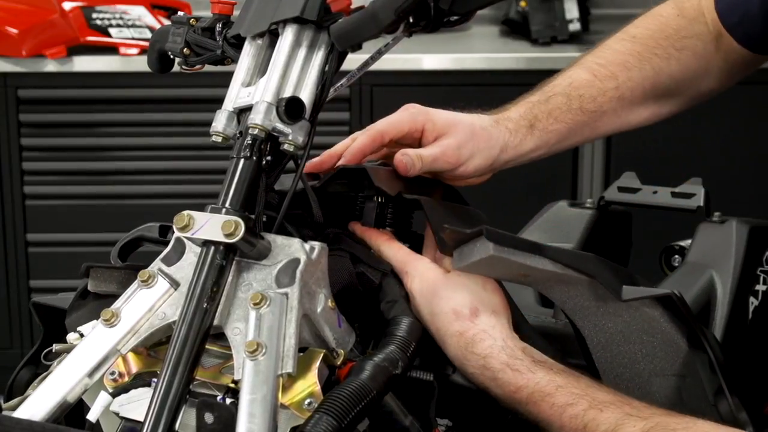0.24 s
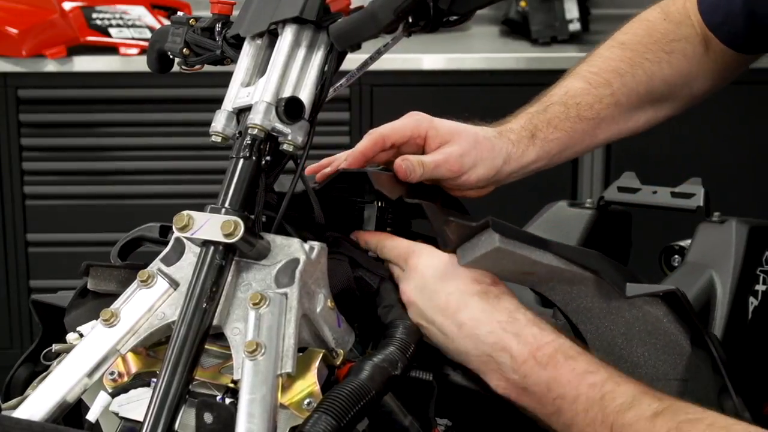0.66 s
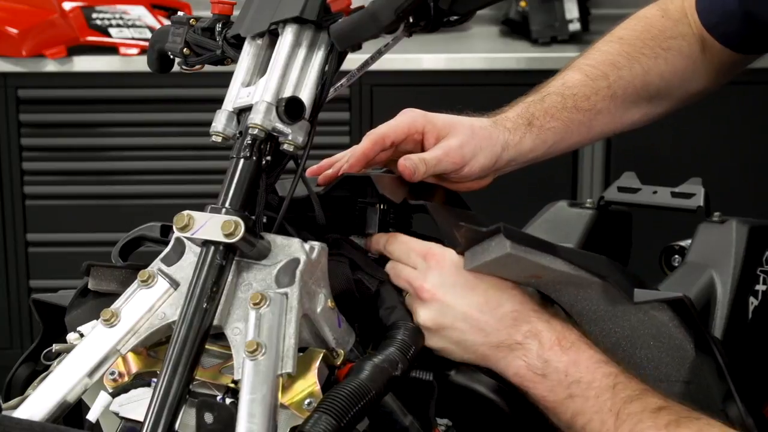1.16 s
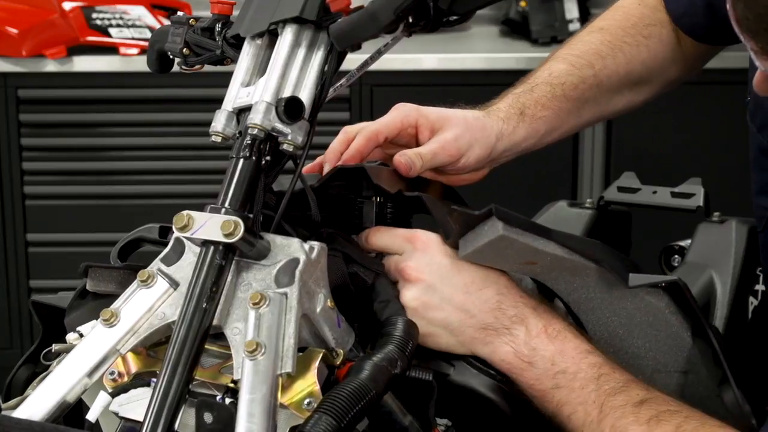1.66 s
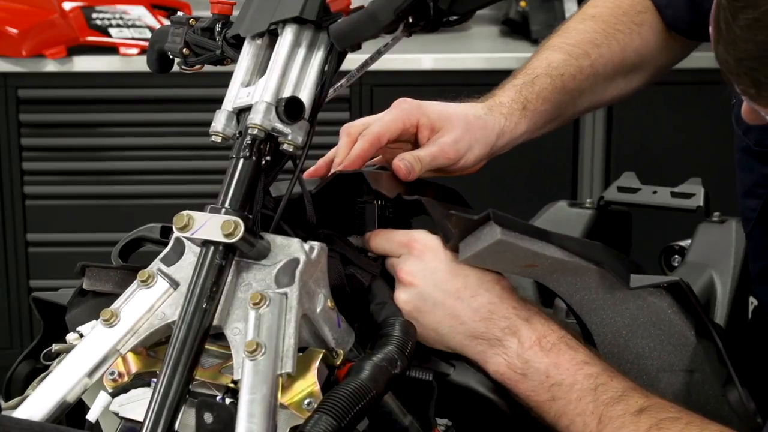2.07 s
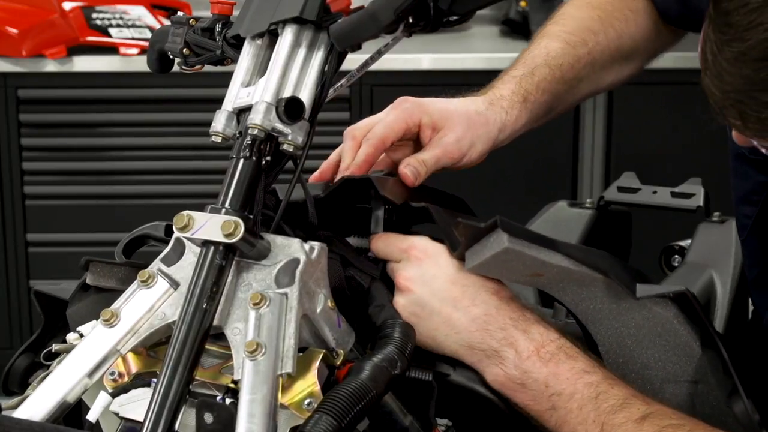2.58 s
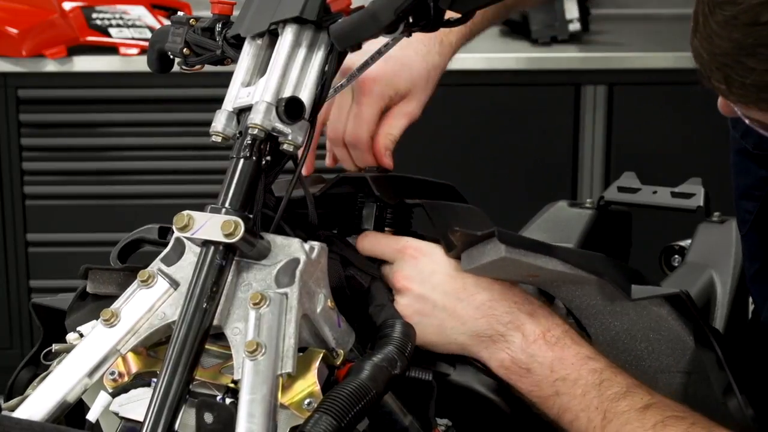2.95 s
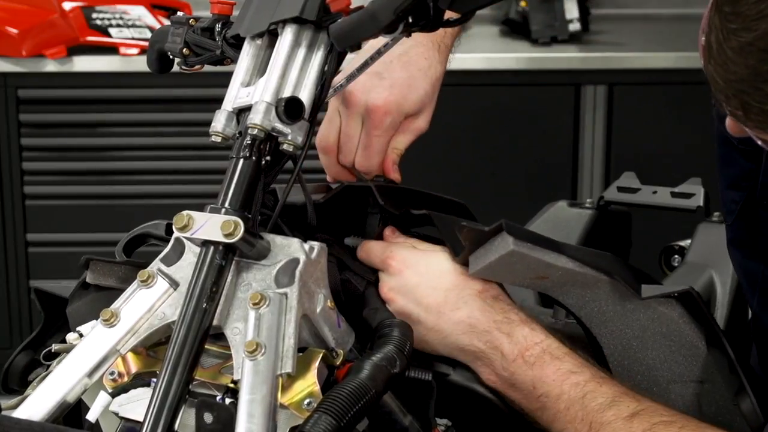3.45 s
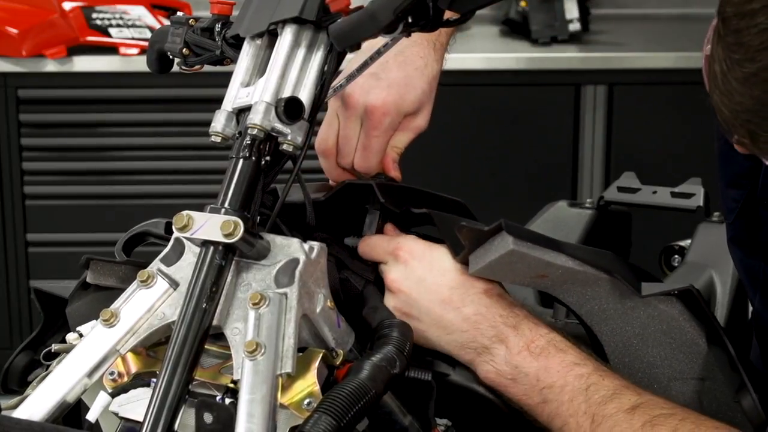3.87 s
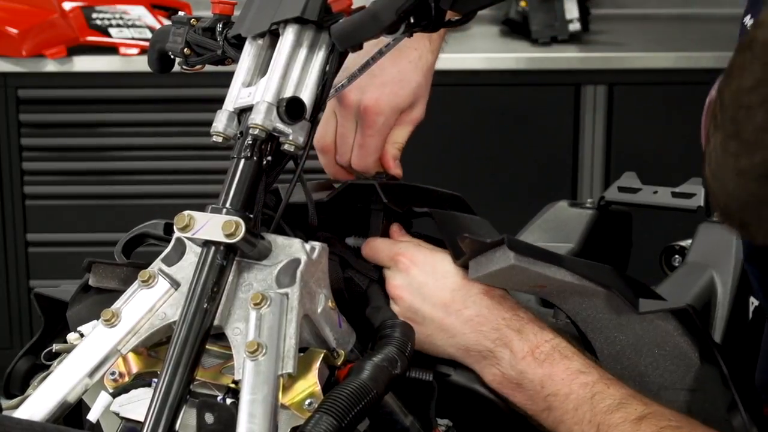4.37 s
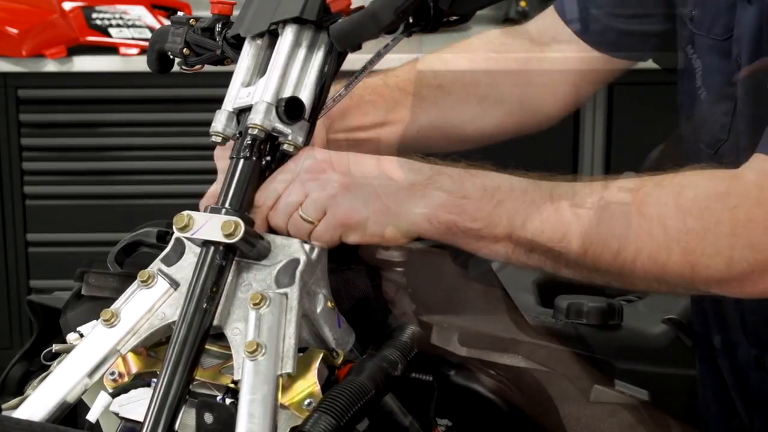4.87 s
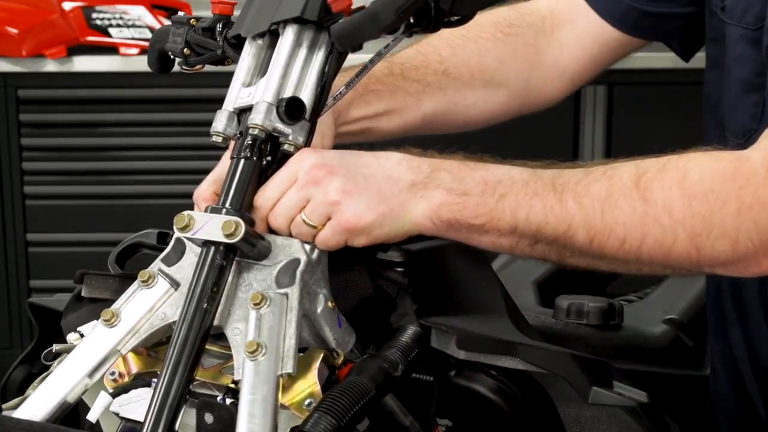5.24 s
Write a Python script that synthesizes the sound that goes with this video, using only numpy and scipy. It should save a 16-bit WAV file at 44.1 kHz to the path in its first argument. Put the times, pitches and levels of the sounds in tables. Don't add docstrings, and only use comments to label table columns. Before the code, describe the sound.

Quiet rustling and scraping of plastic parts on a motorcycle frame, scattered ticks, one loud crisp snap near four seconds, then more handling.

```python
import sys
import numpy as np
from scipy import signal
from scipy.fft import rfft, irfft
from scipy.io import wavfile
from scipy.ndimage import uniform_filter1d

SR = 44100
rng = np.random.default_rng(int(sys.argv[2]) if len(sys.argv) > 2 else 0)


def undo_db(level):
    steps = np.asarray(level, float) / 20
    return 10 ** steps


def unload_wav(signal):
    wavfile.write(
        sys.argv[1],
        SR,
        np.round(np.clip(np.atleast_2d(signal).T, -1, 1) * 32767).astype(np.int16),
    )


N = 243017

# (frequency [Hz], width [Hz], level [dB])
FRAME_MODES = [(60.4, 40, -1.5), (96, 40, -2), (135, 37, 1.5), (203, 51, -1.5), (282.6, 170, -3)]
PANEL_MODES = [(373, 286, -0.5), (548, 170, -3), (690, 200, -3.5), (1000, 340, -8), (1393, 700, -7.5)]
SKIN_MODES = [(1670, 560, 5), (2500, 670, 0.5), (3580, 1200, 0), (5170, 2200, -0.5)]
CLOTH_MODES = [(7000, 4700, -1.5), (9500, 2400, -.6), (11600, 2100, -0.082), (14450, 1500, -1.7)]
# (start [s], hold [s], panel scrape [dB], frame re scrape [dB])
SHOVES = [(0.0, 0.0026, -53, 6), (.05, 0.093, -69, 12.5), (.29, 0.12, -64, 6), (.46, 0.12, -67.5, 10),
          (.66, .04, -60, 1.5), (.76, 0.065, -76.5, 13), (.92, .1, -60, -4), (1.07, 0.078, -59, -3),
          (1.365, .04, -57, 2), (1.47, 0.062, -59, 3), (1.73, 0.027, -67.5, 9.5), (1.84, 0.052, -59, -3),
          (2.19, 0.037, -60.5, 3), (2.27, 0.06, -58.5, 3), (2.42, 0.045, -56, 6.5), (2.69, 0.035, -51, 3),
          (2.83, .04, -65, 11), (2.96, 0.071, -58, 1), (3.16, .02, -57, -9), (3.26, 0.015, -57.5, 0),
          (3.55, 0.029, -72, 3), (3.75, 0.012, -76, -9), (4.03, .1, -57, 5), (4.33, 0.098, -56, 4),
          (4.5, 0.061, -62.5, 3.5), (4.81, .02, -56.5, -10), (4.94, 0.031, -54.5, -5.5),
          (5.05, .02, -61, 2), (5.13, 0.064, -60, 2.5), (5.39, 0.095, -53, 6)]
# (start [s], hold [s], cloth hiss [dB], skin drag re hiss [dB])
SLIDES = [(0.0, .005, -75, 6), (.4, 0.02, -70.5, -4), (.665, 0.02, -68, 5.5), (.825, 0.015, -68, -9),
          (.92, 0.1, -82, 17), (1.09, 0.062, -72, 7), (1.24, 0.012, -82.5, 12), (1.32, 0.071, -63.5, -1),
          (1.69, 0.0085, -84, 9), (1.85, 0.054, -74.5, 4.5), (1.96, 0.076, -72, 6.5),
          (2.1, 0.0076, -75.5, 4), (2.17, 0.033, -76.5, 5.5), (2.3, 0.033, -72.5, 6),
          (2.42, 0.016, -74.5, 8), (2.59, .05, -73.5, 1), (2.68, 0.044, -72.5, 3), (2.77, .11, -76.5, 3.5),
          (3.01, .015, -72.5, 8.5), (3.18, 0.054, -76.5, 9.5), (3.26, 0.037, -75, 4),
          (3.75, 0.012, -83.5, 12), (4.34, 0.088, -64, 1.5), (4.44, 0.12, -65.5, -5),
          (4.6, 0.036, -71, 4.5), (4.68, 0.2, -70.5, 0.5), (4.9, 0.092, -67.5, -2), (4.95, .025, -74, 14.5),
          (5.05, 0.1, -74.5, 1.5), (5.34, 0.055, -72, 5)]
REST_DB = [-63, -68, -77.5, -83]
# (time [s], blow on the tab [dB], blow on the bracket [dB])
LATCH_SLIPS = [(3.947, -19, -30.5), (3.9473, -5, -18.5), (3.9486, 0, -15.5), (3.9499, -3.5, -17),
               (3.9506, -2, -10.5), (3.9516, -4, 5), (3.9522, -1.5, -1), (3.9535, -7, -7),
               (3.9544, -11, -9), (3.9567, -15, -10.5), (3.9596, -24.5, -7)]
# (frequency [Hz], level [dB], time to fall 60 dB [s])
SHELL_MODES = [(42, -19, 0.043), (447, -13, .065), (725, -7, 0.03), (905, -7, .04), (1031, -11, 0.04),
               (1125, -12, 0.03), (1290, -14, 0.03), (1431, -12, 0.035), (1650, -7, .028), (1935, -9, .016),
               (2400, -5, 0.012), (2800, -3, .013), (3190, -4, .02), (3455, 3.5, .02), (3760, -9.5, .015),
               (4035, -3, 0.014), (4630, -10, 0.015), (4905, -1, 0.015), (5560, -10.5, 0.014),
               (6200, -15.5, .008), (6900, -10, 0.009), (7490, -15, 0.006), (9220, -18.5, .007),
               (10200, -9, 0.0051), (12800, -22.5, .007), (14500, -25, .007)]
# (time [s], peak [dB], ring [Hz], panel re peak [dB])
TAPS = [(.0005, -40, 1000, 1), (.002, -49, 1700, -5), (.012, -47, 1150, -3), (.058, -58, 4100, 0),
        (.36, -61, 1800, 0), (.447, -59, 2000, 0), (.553, -58, 1500, 0), (.617, -63, 4200, 2),
        (0.2945, -49, 800, 0), (.399, -54.5, 1180, -2), (0.4749, -51, 1600, 0), (.6438, -55, 1170, -9),
        (0.6693, -56, 2550, 2), (0.8755, -51, 1090, -18), (1.317, -48, 1300, 2.5), (1.451, -51, 1090, -12),
        (1.477, -42, 1600, -11), (1.8465, -50.5, 1090, 6), (1.847, -54, 3700, -6), (1.882, -56, 760, -4),
        (1.898, -56, 700, -4), (1.916, -59, 2500, 0), (1.504, -59, 2300, 5), (1.56, -56, 1800, 2),
        (2.0853, -61.5, 1390, 0), (2.1971, -48, 1670, -2), (2.352, -59, 1010, -3), (2.419, -56, 4500, 6),
        (2.647, -51, 1000, -2), (2.682, -40.5, 790, -3), (2.7268, -38, 1090, -3), (2.772, -57, 1030, 10.5),
        (2.9647, -49, 1130, -2.5), (3.0092, -50, 1620, -2), (3.259, -42, 320, 0), (4.3769, -53, 1020, -1),
        (4.64, -54.5, 2500, 4.5), (4.817, -51, 2000, 2), (4.9531, -46, 1540, -1),
        (5.147, -59.5, 1232, 10.5), (5.3363, -49, 1400, -3), (5.3445, -54, 900, 0), (5.3515, -55, 2300, 4),
        (5.358, -54, 800, 0), (5.3728, -36, 950, -3), (5.385, -54, 2800, 9), (5.401, -54, 2500, 8),
        (5.414, -54, 2100, 8), (5.437, -56, 2600, 9), (5.479, -52, 1100, 2), (5.4614, -51, 1250, 1.5)]
# (time [s], peak [dB], ring [Hz], crack re peak [dB], time to fall 60 dB [s])
CLICKS = [(2.5195, -59, 4000, -13, .02), (2.576, -40, 4300, -12, 0.011), (2.576, -33, 13000, -20, 0.011),
          (2.5766, -31, 7000, 0.5, .009), (2.6063, -41.5, 1200, 9, 0.0066), (2.6068, -28, 5800, -4, .013),
          (2.607, -32, 12500, -20, .014), (3.1695, -52, 4340, -10, 0.026), (3.2546, -38, 2900, -20, 0.013),
          (3.2544, -40, 8300, -4, .016), (3.3447, -36.5, 2220, -30, .007), (3.345, -42.5, 5500, -8, .01),
          (3.6013, -49, 2300, -12, 0.011), (4.2095, -46, 6200, 0.5, .017), (4.2095, -37, 3480, -13, 0.024),
          (4.865, -51.5, 1000, 5, .019), (5.039, -56, 5030, -7, .013), (5.155, -55, 3500, -5, .027),
          (5.238, -58, 3490, -1, .015)]
# (frequency [Hz], level [dB], time to fall 60 dB [s])
CLIP_MODES = [(460, -7, .03), (775, -2, .024), (1070, -5, .03), (1270, -8, .03), (1650, 0, .034),
              (2380, -5, .016), (2750, -3, .013), (3200, -5, .014), (3900, -6, .011), (4830, -11, .014),
              (5470, -14, .013), (6500, -18, .01), (7430, -12, .009), (8400, -12, .007)]
# (time [s], level [dB], pitch factor [1], tilt away from main ring [dB per octave])
FLICKS = [
    (3.1675, -49, 1.045, -4),
    (3.1693, -38, 1.045, -4.5),
    (3.1727, -44, 1.045, -6),
    (3.2435, -58, 1.01, 0),
    (3.2542, -36.5, 1.001, .6),
    (3.2554, -39, 1.001, .6),
]
# (time [s], peak [dB], ring [Hz], time to fall 60 dB [s])
KNOCKS = [(0.001, -34.5, 260, 0.07), (.004, -40, 460, .1), (.025, -44, 250, .15), (.016, -45, 640, .08),
          (0.671, -48.5, 544, 0.17), (1.3555, -35.5, 270, 0.045), (1.403, -45, 122, 0.044),
          (1.452, -45, 199, 0.056), (1.479, -40.5, 540, 0.047), (2.199, -43, 220, 0.083),
          (2.428, -50, 138, 0.055), (2.576, -46, 51.6, 0.1), (2.607, -40.5, 45.8, 0.06),
          (2.699, -38.5, 164, 0.056), (2.6875, -43, 480, .04), (2.706, -39, 420, 0.04),
          (2.716, -43, 560, .04), (2.731, -39, 620, .035), (2.735, -36.5, 232, 0.044),
          (3.169, -52, 37.7, 0.06), (3.26, -43, 112, 0.073), (3.564, -43.5, 162.4, 0.093),
          (4.285, -39, 135, 0.1), (4.349, -42.5, 72, 0.13), (5.379, -35, 118, 0.079),
          (5.398, -31.5, 308, 0.12), (5.424, -33.5, 373, 0.069), (5.438, -34, 374, 0.076),
          (5.3745, -40, 420, .06), (5.408, -39, 520, .07), (5.451, -41, 330, .1), (5.477, -41, 360, .1),
          (5.497, -43, 300, .08)]
# (time [s], peak [dB])
PRICKS = [(.107, -64), (.145, -57), (.212, -61), (1.429, -64), (1.553, -58), (1.793, -60), (2.173, -53),
          (2.545, -57), (2.6155, -48), (2.625, -57), (3.244, -62), (3.326, -55), (3.505, -56), (4.203, -55),
          (4.332, -55), (4.47, -56), (4.527, -53), (4.889, -52), (4.912, -53), (5.081, -54)]
# (delay [s], level [dB])
ECHOES = [
    (.009, -30),
    (.0185, -20),
    (.029, -25),
]
# (frequency [Hz], level [dB], time to fall 60 dB [s])
TICK_ROOM = [(500, -62, .8), (1500, -67, 0.61), (4000, -62, 0.6), (10000, -68, 0.5)]
SNAP_ROOM = [(304, -55, 0.69), (641, -52, 0.93), (1177, -54.5, 1.53), (1650, -54, 1.1), (2940, -52.5, 1.6),
             (3510, -44.5, 1.44), (4910, -56.5, 0.6), (7000, -60.5, 0.6), (10000, -63, 0.35),
             (14000, -64.5, .3)]
# (frequency [Hz], level per Hz [dB])
AIR_COLOUR = [(15, -43.5), (25, -13.5), (130, -0.5), (293, -12.5), (695, -8), (818, -16), (962, -12.5),
              (3080, -30.5), (12900, -37), (16000, -43)]

SHOVE_RISE_DB_S, SHOVE_FALL_DB_S = 301, 206
SLIDE_RISE_DB_S, SLIDE_FALL_DB_S = 414, 270
LATCH_DB, AIR_DB, LEFT_DB = -18.5, -66, 6.5
TAP_CRACK_DB, TAP_T60_S = -27, 0.032
CLICK_BODY_DB, ATTACK_S = -14, .0002
TOP_HZ, STEADY_TOP_HZ = 16400, 15750


def band(x, hz, width):
    return signal.lfilter(*signal.iirpeak(min(hz, .45 * SR), hz / width, fs=SR), x)


def unit(x):
    return x / np.sqrt(np.mean(x ** 2))


def walk(rate):
    k = int(SR / rate)
    held = np.repeat(rng.standard_normal(N // k + 1), k)
    return 1.3 * uniform_filter1d(uniform_filter1d(held, k), k)[:N]


def ring(hz, t60, count):
    t = np.arange(count) / SR
    return np.sin(2 * np.pi * hz * t) * 1000. ** (-t / t60)


def add(out, s, piece):
    i = int(s * SR)
    out[i:i + len(piece)] += piece[:N - i]


def cut(x, hz):
    return signal.sosfilt(signal.ellip(10, .2, 70, hz, fs=SR, output="sos"), x)


def strokes(rows, rise_db_s, fall_db_s):
    t = np.arange(N // 64 + 1) * 64 / SR
    first, second = 0, 0
    for s, hold, db, other_db in rows:
        before, after = np.maximum(s - t, 0), np.maximum(t - s - hold, 0)
        stroke = undo_db(db - rise_db_s * before - fall_db_s * after)
        first = np.hypot(first, stroke)
        second = np.hypot(second, stroke * undo_db(other_db))
    fine_t = np.arange(N) / SR
    return np.interp(fine_t, t, first), np.interp(fine_t, t, second)


def rub(modes, rate, spread_db, flicker_db, smooth):
    chance = rng.random((N, 2))
    slips = chance[:, 0] < rate / SR
    grains = slips * undo_db(spread_db * chance[:, 1]) * rng.standard_normal(N)
    push = unit(grains) + smooth * rng.standard_normal(N)
    out = np.zeros(N)
    for k, (hz, width, db) in enumerate(modes):
        tone = unit(band(band(push, hz, width), hz, 2 * width))
        out += (-1) ** k * undo_db(db + flicker_db * walk(25)) * tone
    return unit(out)


def rubbing():
    panel, frame = strokes(SHOVES, SHOVE_RISE_DB_S, SHOVE_FALL_DB_S)
    cloth, skin = strokes(SLIDES, SLIDE_RISE_DB_S, SLIDE_FALL_DB_S)
    rest = undo_db(np.array(REST_DB))
    out = np.hypot(frame, rest[0]) * rub(FRAME_MODES, 120., 6.1, 1.6, 0.95)
    out += np.hypot(panel, rest[1]) * rub(PANEL_MODES, 450., 10.0, 2.4, 1.06)
    out += np.hypot(skin, rest[2]) * rub(SKIN_MODES, 1200., 8., 1.6, 1.3)
    out += np.hypot(cloth, rest[3]) * rub(CLOTH_MODES, 3000., 8., 2.1, 1.8)
    return out


def latch():
    out, t = np.zeros(N), np.arange(256) / SR
    spots = rng.standard_normal((len(LATCH_SLIPS), len(SHELL_MODES), 2))
    for (s, tab_db, bracket_db), spot in zip(LATCH_SLIPS, spots):
        for k, ((hz, db, t60), (side, shift)) in enumerate(zip(SHELL_MODES, spot)):
            on_tab = hz > 2200
            blow_db = tab_db if on_tab else bracket_db
            sign = np.sign(side) if on_tab else (-1) ** k
            level = undo_db(LATCH_DB + blow_db + db + 1.1 * shift)
            add(out, s, sign * level * ring(hz * (1 + 0.0062 * shift), t60, count=8192))
        scrape = rng.standard_normal(256) * 1000. ** (-t / 0.0072)
        add(out, s, undo_db(LATCH_DB + tab_db - 13.5) * band(scrape, 10000, 9000))
    return out


def tick(hz, body_db, crack_db, t60, noise):
    t = np.arange(4096) / SR
    burst = noise * np.minimum(t / ATTACK_S, 1) * 1000. ** (-t / np.clip(t60, .004, .2))
    contacts = np.abs(noise[:64]) * 1000. ** (-t[:64] / .0016)
    push = np.convolve(contacts, np.hanning(3 + int(SR / hz / 2)))
    ringing = ring(hz, t60, count=4096) + .5 * ring(1.27 * hz, .7 * t60, count=4096)
    tone = np.convolve(push, ringing)[:4096]
    rattle = band(band(band(burst, hz, .4 * hz), hz, .8 * hz), hz, hz)
    tone = tone / np.abs(tone).max() + 1.5 * rattle * np.sqrt(3000 / hz)
    body = band(sum(band(burst, f, w) * undo_db(g) for f, w, g in PANEL_MODES), 600, 1500)
    crack = noise * 1000. ** (-t / min(t60, .018))
    crack = band(band(crack, 10500, 9000), 10500, 12000)
    parts = ((0, tone), (body_db, body), (crack_db, crack))
    return sum(undo_db(g) * part / np.abs(part).max() for g, part in parts)


def ticks():
    out = np.zeros(N)
    rows = [(*tap, TAP_CRACK_DB, TAP_T60_S) for tap in TAPS]
    rows += [(s, db, hz, CLICK_BODY_DB, crack_db, t60) for s, db, hz, crack_db, t60 in CLICKS]
    for s, db, hz, body_db, crack_db, t60 in rows:
        add(out, s, undo_db(db) * tick(hz, body_db, crack_db, t60, rng.standard_normal(4096)))
    return out


def flicks():
    out, main_hz = np.zeros(N), CLIP_MODES[4][0]
    for s, db, pitch, tilt_db in FLICKS:
        for k, (hz, mode_db, t60) in enumerate(CLIP_MODES):
            level = undo_db(db + mode_db + tilt_db * abs(np.log2(hz / main_hz)))
            add(out, s, (-1) ** k * level * ring(hz * pitch, t60, count=4096))
    return out


def knocks():
    out = np.zeros(N)
    for s, db, hz, t60 in KNOCKS:
        t60 = np.clip(t60, .01, .3)
        ringing = ring(hz, t60, count=8192) + 0.54 * ring(1.6 * hz, 1.2 * t60, count=8192)
        piece = np.convolve(ringing, np.hanning(40))
        add(out, s, undo_db(db) * piece / np.abs(piece).max())
    return out


def pricks():
    out, t = np.zeros(N), np.arange(512) / SR
    for s, db in PRICKS:
        piece = band(rng.standard_normal(512) * 1000. ** (-t / .012), 9200, 9300)
        add(out, s, undo_db(db) * piece / np.abs(piece).max())
    return out


def echoes(x):
    bright = band(x, 6000, 9000)
    return sum(undo_db(db) * np.roll(bright, int(s * SR)) for s, db in ECHOES)


def room(colour):
    t = np.arange(2 * SR) / SR
    tail = np.zeros(2 * SR)
    for hz, db, t60 in colour:
        noise = rng.standard_normal(2 * SR)
        noise = unit(band(band(noise, hz, 0.37 * hz), hz, 0.37 * hz))
        tail += undo_db(db) * noise * 1000. ** (-t / t60)
    return tail * (1 - np.exp(-(t / 0.015) ** 3))


def leftover():
    fade = 1000. ** (-np.arange(N) / SR / 1.8)
    return undo_db(-77) * unit(band(rng.standard_normal(N), 4030, 250)) * fade


def air():
    hz, db = np.transpose(AIR_COLOUR)
    f = np.maximum(np.arange(N // 2 + 1) * SR / N, 1)
    colour = undo_db(np.interp(np.log(f), np.log(hz), db))
    noise = irfft(rfft(rng.standard_normal(N)) * colour, N)
    return unit(noise) * undo_db(AIR_DB + 0.23 * walk(1.8))


def scene():
    hits = ticks() + pricks() + flicks()
    snap = latch()
    steady = rubbing() + knocks() + air() + leftover()
    steady += signal.fftconvolve(hits, room(TICK_ROOM))[:N]
    add(steady, LATCH_SLIPS[0][0], room(SNAP_ROOM))
    mono = cut(steady + echoes(snap + hits), STEADY_TOP_HZ) + snap + hits
    left, right = undo_db(LEFT_DB / 2), undo_db(-LEFT_DB / 2)
    return np.outer([left, right], mono) * 2 / (left + right)


def top_cut(x):
    return signal.sosfilt(signal.butter(12, 16650, fs=SR, output="sos"), x)


def record(dry):
    mix = cut(dry, TOP_HZ)
    return top_cut(mix)


dry = scene()
out = record(dry)
unload_wav(out)
```